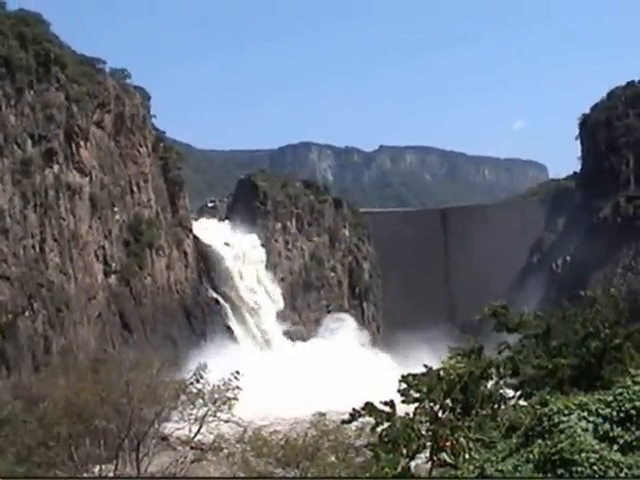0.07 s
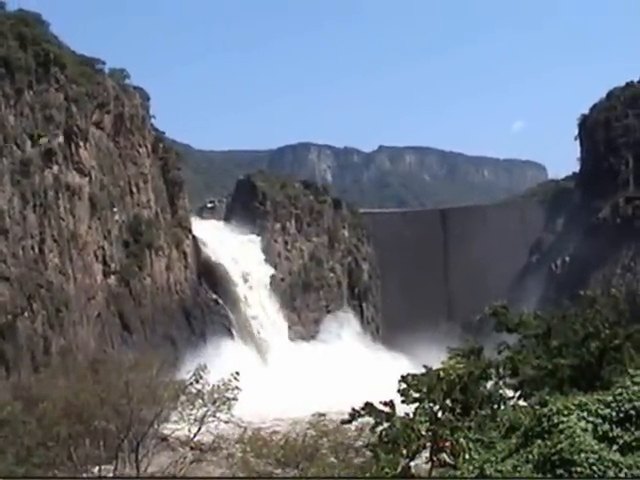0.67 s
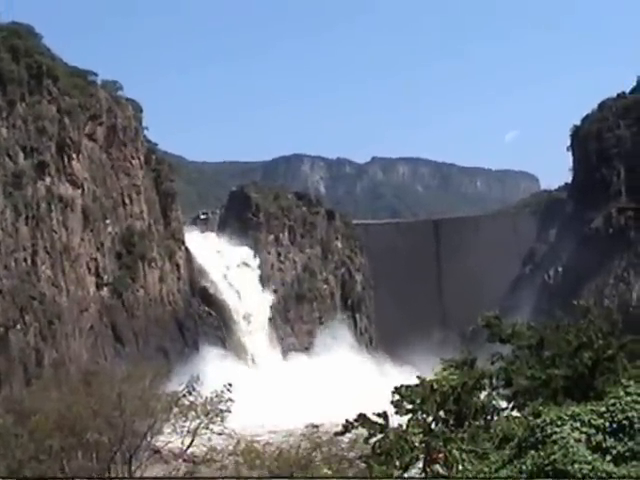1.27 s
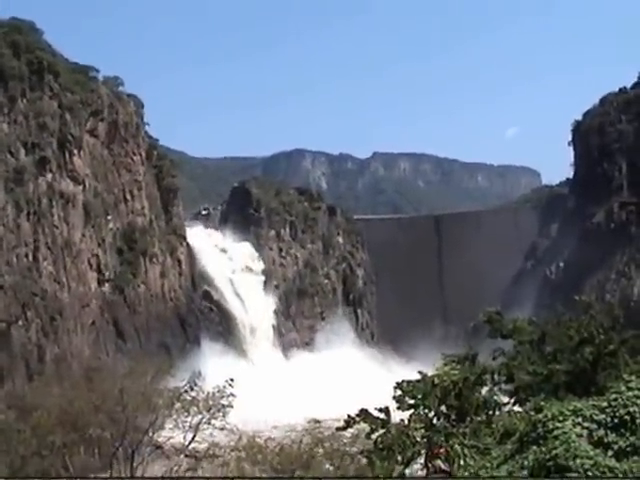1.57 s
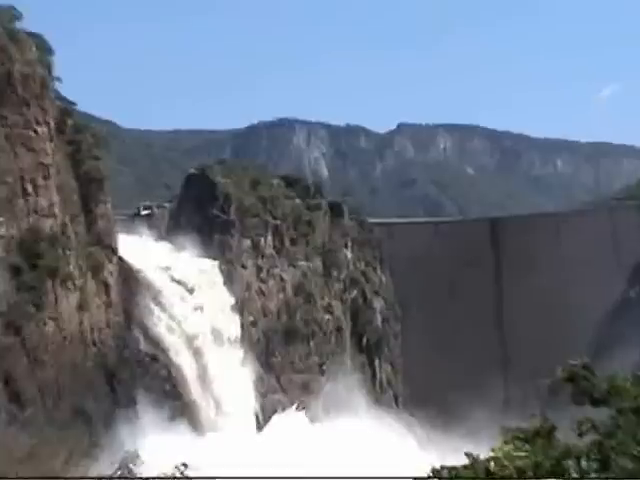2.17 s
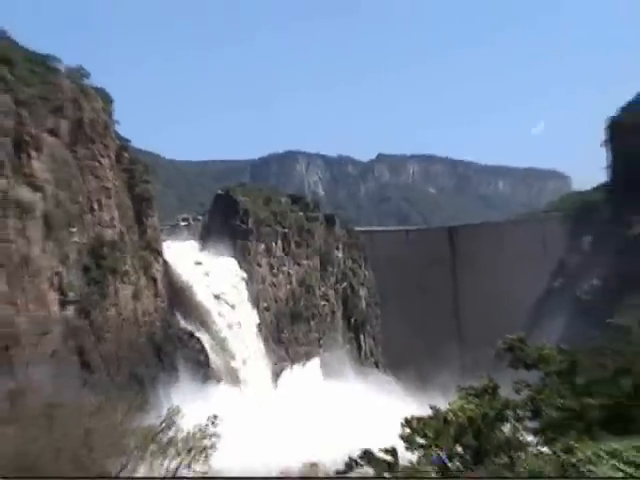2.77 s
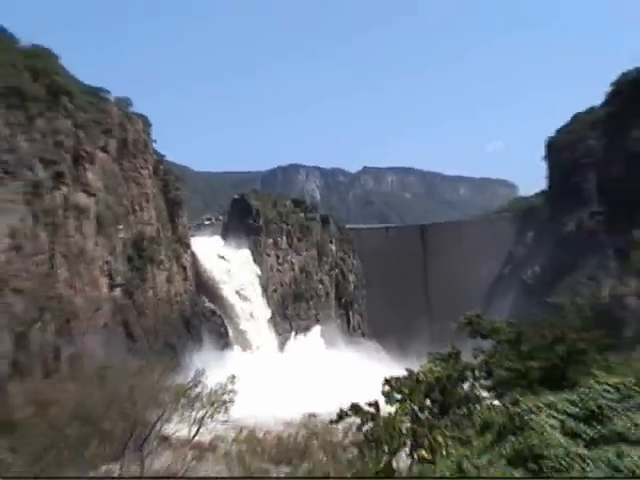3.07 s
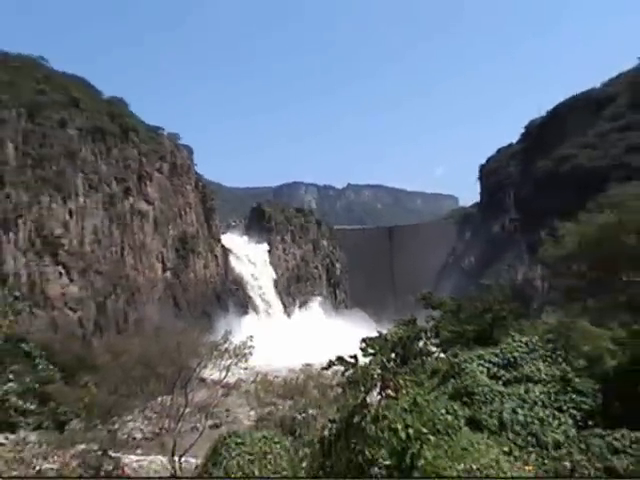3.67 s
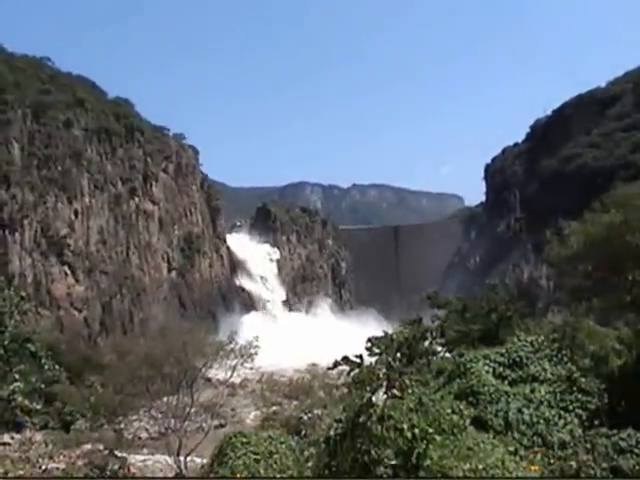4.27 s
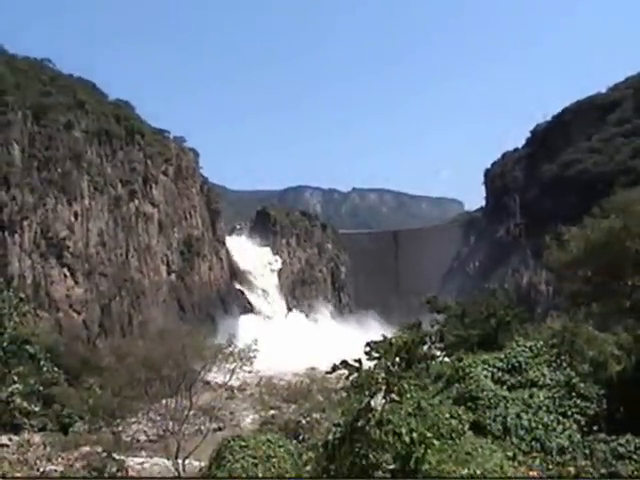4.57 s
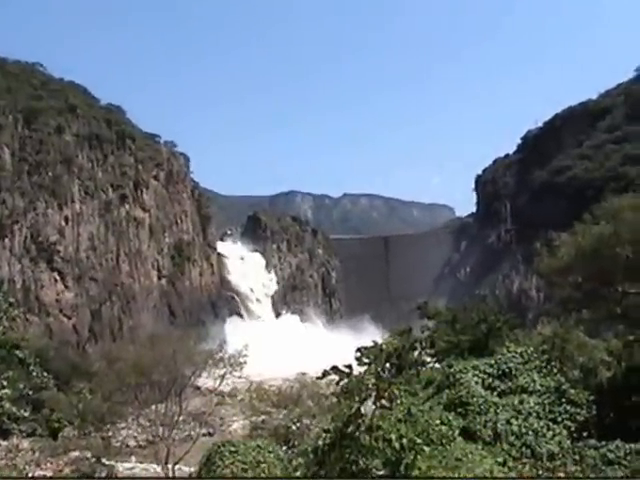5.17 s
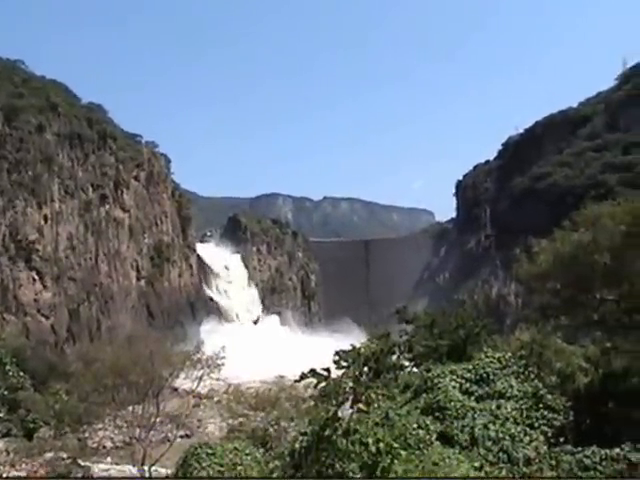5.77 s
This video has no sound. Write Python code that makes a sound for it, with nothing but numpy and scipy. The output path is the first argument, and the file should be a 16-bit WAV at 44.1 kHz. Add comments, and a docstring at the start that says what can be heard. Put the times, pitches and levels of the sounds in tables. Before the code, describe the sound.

Heavy falling water roars and rumbles steadily across a rock gorge, swelling slightly as it splashes into the pool.

```python
"""A large waterfall drops into a churning pool in a rock gorge, far from a hand-held stereo camera.
The plunge rumbles, roars and splashes, surging as heavier masses of water reach the pool;
above it the falling sheet and its spray rush almost evenly, dulled by the air on the way.
The gorge walls scatter the sound, so it differs between the two microphone ports.
Close by there is only one tiny tick on the camera body and a faint high hiss."""
import sys
import numpy as np
from scipy import signal
from scipy.fft import rfft, irfft, next_fast_len
from scipy.io import wavfile
from scipy.ndimage import uniform_filter1d, map_coordinates

SR = 44100
rng = np.random.default_rng(int(sys.argv[2]) if len(sys.argv) > 2 else 0)


def to_wav(sig):
    """Store sig (one row per channel, or 1-D mono) as 16-bit WAV at the path in sys.argv[1].

    Samples outside -1..1 are clipped; the rate is SR.
    """
    pcm = np.clip(np.atleast_2d(sig), -1, 1) * 32767
    pcm = np.round(pcm).astype(np.int16)
    wavfile.write(sys.argv[1], SR, pcm.T)  # frames by channels


N = 264820


def waterfall(rumble_db=-43, roar_db=-33.0, splash_db=-41.0, rush_db=-33.5, rush_follows=.05):
    """The plunge throbs and splashes; the spray, summed over a wide face, stays nearly even."""
    # Four spectra as heard across the gorge. Each row: frequency in Hz, spectral level in dB.
    heaving_pool = [(10, -17.5), (22, -2), (35, -6.5), (46, 3), (80, 1.5), (104, -1.5), (180, -31.5),
                    (600, -120)]
    plunging_water = [(30, -22), (70, -12), (104, -4.5), (128, 1.5), (160, 0), (195, 1.5), (245, 0.2),
                      (300, 0.4), (420, -2.5), (600, -14), (1200, -22), (3000, -66.5)]
    water_falling_back = [(60, -120), (350, -39), (580, -5.5), (720, 0), (900, -1.5), (1150, -8.5),
                          (2000, -35.5), (6000, -120)]
    sheet_and_spray = [(100, -12), (350, -3.5), (570, -2.5), (730, 0.25), (1000, -2.5), (1250, -2.5),
                       (1450, -7.5), (1680, -6), (3150, -14.5), (3700, -20), (4100, -18), (4550, -21),
                       (5200, -21), (6500, -26), (8000, -35), (9600, -53.5), (10800, -84)]
    rumble_rise_db, roar_rise_db, splash_rise_db = surges()
    roar_waver_db = 0.15 * wobble(8.9)
    rush_waver_db = rush_follows * roar_rise_db + 0.12 * wobble(6.0)
    rumble = amp(rumble_db + rumble_rise_db) * from_afar(heaving_pool, patchy_db=0.1)
    roar = amp(roar_db + roar_rise_db + roar_waver_db) * from_afar(plunging_water, patchy_db=0.3)
    splash = amp(splash_db + splash_rise_db) * from_afar(water_falling_back, patchy_db=0.2)
    rush = amp(rush_db + rush_waver_db) * from_afar(sheet_and_spray, patchy_db=0.57)
    return rumble + roar + splash + rush


def surges():
    """Masses of water reach the pool: smooth swells and dips in dB for rumble, roar and splash."""
    # Each row: crest in seconds, length in seconds, rise in dB of the rumble, the roar and the splash.
    water_masses = [(.33, 1, 4, 2.5, -1), (.8, 0.5, 3, 2.5, 3.2), (1.1, 0.3, 5, 2, 1),
                    (1.4, .3, 7.5, -0.5, 3), (1.553, 0.35, -2, 2, -1), (2.42, 1, -3.5, 1.5, 2.7),
                    (2.832, 0.48, 4, 2, .3), (3.08, .4, 1.5, 0.5, 3), (3.523, 0.67, 6.5, 1.5, 2.5),
                    (3.923, 0.78, 2, 2, 3.5), (4.21, .45, 3.5, .5, -2), (4.527, 0.38, 3, -1, 1.5),
                    (4.78, .25, -8, 1, 3), (5.2, .25, 3, 0.7, 2.8), (5.462, 0.69, 3, 1.7, 3),
                    (5.98, .3, 6, -0.5, -1)]
    curves_db = np.zeros((3, N))
    for crest_s, length_s, *rise_db in water_masses:
        half_s = length_s / 2
        swell = ramp(crest_s - half_s, half_s) - ramp(crest_s, half_s)
        curves_db += np.outer(rise_db, swell)
    return curves_db


def from_afar(spectrum, patchy_db, bend_below_hz=420):
    """Far water at rms 1: direct sound reaches both ports; what the walls scatter differs between them."""
    # The stereo width. Each row: frequency in Hz, side minus mid in dB.
    width = [(30, -31), (65, -42.5), (110, -44), (200, -32.5), (300, -25), (540, -10.5), (750, -15.5),
             (1200, -11), (1450, -7.5), (2200, -10), (3500, -3.5), (5400, -8.5), (6500, -4.5), (8500, -16)]
    # The level gap between the ports. Each row: frequency in Hz, left minus right in dB.
    balance = [(350, -0.5), (600, -1), (1400, -1.1), (1900, 0), (2600, 0.5), (3200, 1), (3900, 4),
               (4600, 3), (5100, 5), (6300, 1.5), (7600, 0.5)]
    # The phase gap between the ports. Each row: frequency in Hz, lead of the left in radians.
    lead = [(300, 0.31), (1000, 0.053), (1500, 0.17), (2400, 0.83), (2900, 0.9), (3800, 0.76), (4300, 0.61),
            (4750, 1), (5400, 0), (8000, 0.14)]

    def ports(hz):
        # long waves bend round the camera and arrive alike on both sides
        shade = hz ** 4 / (hz ** 4 + bend_below_hz ** 4)
        phase = np.outer([.5, -.5], shade * along(lead, hz))
        return panned(shade * along(balance, hz)) * np.exp(1j * phase)

    direct, scattered = churn(spectrum, patchy_db)
    side = filtered(scattered, lambda hz: amp(along(width, hz)))
    return unit(filtered(np.array([direct + side, direct - side]), ports))


def churn(spectrum, patchy_db):
    """Two unrelated coloured noises whose bands swell and sink in random patches."""
    bands = signal.stft(rng.standard_normal((2, N)), nperseg=512)[2]
    patches = rng.standard_normal(bands.shape[1:])
    patches = uniform_filter1d(patches, size=5, axis=0)  # smooth across frequency
    patches = uniform_filter1d(patches, size=18, axis=1)  # and across time
    pair = signal.istft(bands * amp(patchy_db * unit(patches)), nperseg=512)[1][:, :N]
    return filtered(pair, lambda hz: amp(along(spectrum, hz)))


def camera_tick(contact_ms=.3):
    """A small hard contact rings the camera's plastic shell, right at the microphone."""
    # The tick and its rebound. Each row: start in seconds, level in dB, left minus right in dB.
    contacts = [(2.976, -32.5, -4.5), (2.979, -43, -4.5)]
    # The shell's modes. Each row: frequency in Hz, level in dB, seconds to fall by 60 dB.
    shell_modes = [(3400, 0, .012), (6260, -4, 0.0058), (6750, 0, 0.0061), (8300, -7, 0.008),
                   (9000, -4, 0.0082), (9600, -8, 0.008)]
    t = np.arange(SR // 20) / SR
    ring = sum(amp(db - 60 * t / t60) * np.sin(2 * np.pi * hz * t) for hz, db, t60 in shell_modes)
    ring *= 1 - np.exp(-t * 1000 / contact_ms)
    out = np.zeros((2, N))
    for start_s, db, balance_db in contacts:
        start = round(start_s * SR)
        out[:, start:start + len(t)] += np.outer(panned(balance_db), amp(db) * ring)
    return out


def hiss(faint_db=-69.5, rise_db=4, side_db=-10):
    """A faint narrow hiss near the microphone, almost centred; it grows once and stays there."""
    # Its colour. Each row: frequency in Hz, spectral level in dB.
    spectrum = [(7500, -36), (8400, 0.5), (8720, 12.5), (9000, 5), (9220, 3.5), (9450, -4.5), (9900, -6.5),
                (10400, -29)]
    level_db = faint_db + rise_db * ramp(start_s=3.3, length_s=0.63)
    mid, side = churn(spectrum, patchy_db=2.0)
    side = amp(side_db) * side
    return amp(level_db) * unit(np.array([mid + side, mid - side]))


def amp(db):
    """Decibels to gain."""
    return 10 ** (np.asarray(db) / 20)


def unit(x):
    """x at rms 1."""
    return x / np.sqrt(np.mean(x ** 2) + 1e-20)


def along(points, hz):
    """(Hz, value) points read on a log frequency axis."""
    point_hz, values = np.transpose(points)
    return np.interp(np.log(hz + 1), np.log(point_hz + 1), values)


def wobble(knots_per_s):
    """A smooth random curve."""
    knots = rng.standard_normal(int(N * knots_per_s / SR) + 4)
    return map_coordinates(knots, [np.arange(N) * knots_per_s / SR])


def ramp(start_s, length_s):
    """A smooth rise from 0 to 1, one value per sample."""
    progress = np.clip((np.arange(N) / SR - start_s) / length_s, 0, 1)
    return np.sin(np.pi / 2 * progress) ** 2


def filtered(x, response):
    """x through a filter given as a complex response of frequency in Hz."""
    size = next_fast_len(N + SR // 2)
    hz = np.fft.rfftfreq(size, 1 / SR)
    return irfft(rfft(x, size) * response(hz), size)[..., :N]


def panned(balance_db):
    """Left and right gains for a level difference."""
    return amp([balance_db / 2, -balance_db / 2])


def scene():
    """The waterfall across the gorge, with the small sounds at the microphone."""
    return waterfall() + camera_tick() + hiss()


def record(dry, top_hz=10840):
    """The camera keeps nothing above its band limit."""
    return filtered(dry, lambda hz: hz < top_hz)


dry = scene()
out = record(dry)
to_wav(out)
```